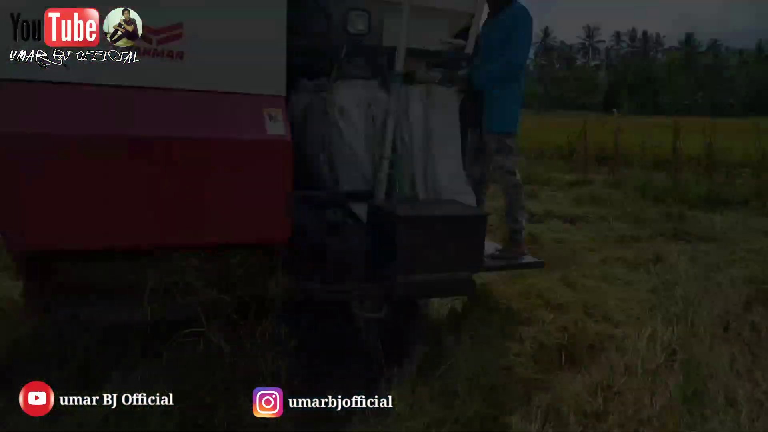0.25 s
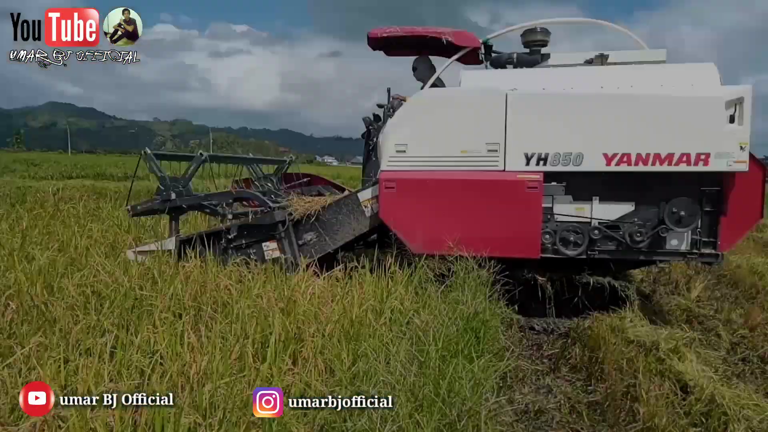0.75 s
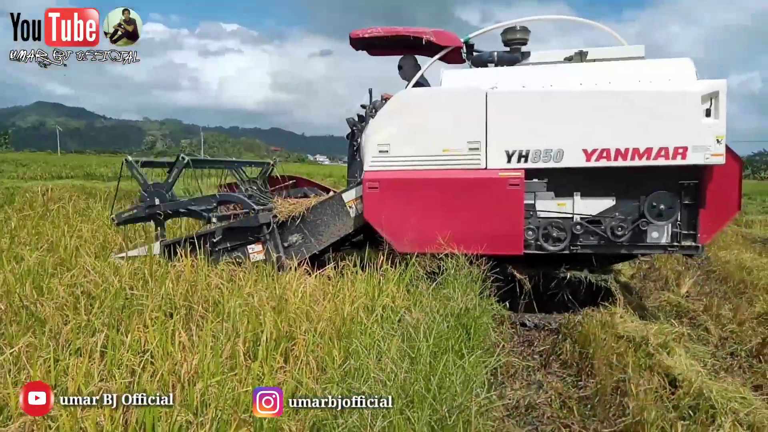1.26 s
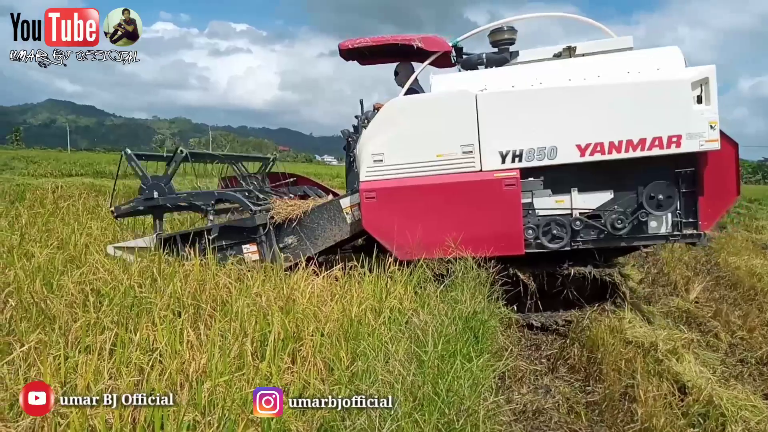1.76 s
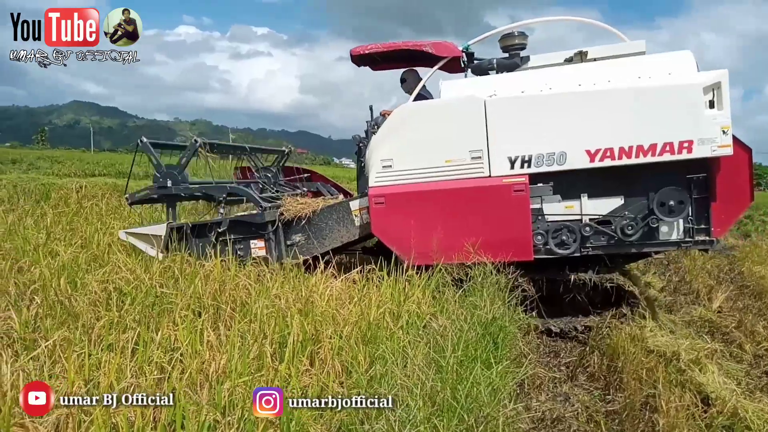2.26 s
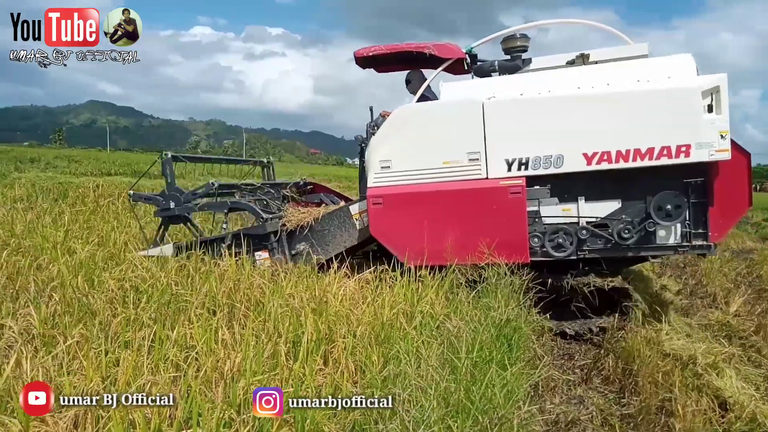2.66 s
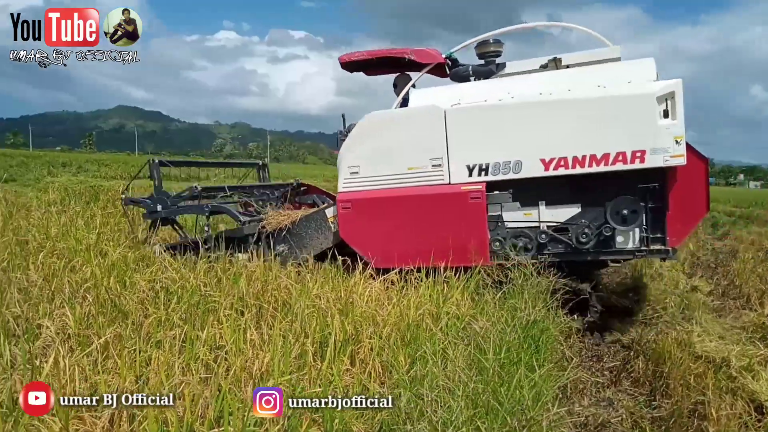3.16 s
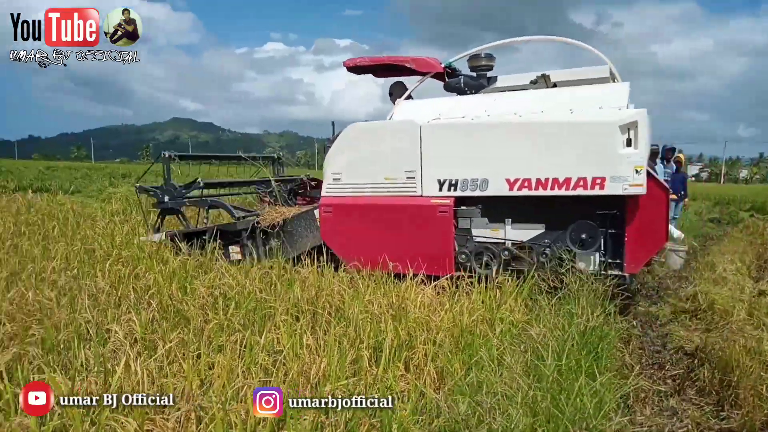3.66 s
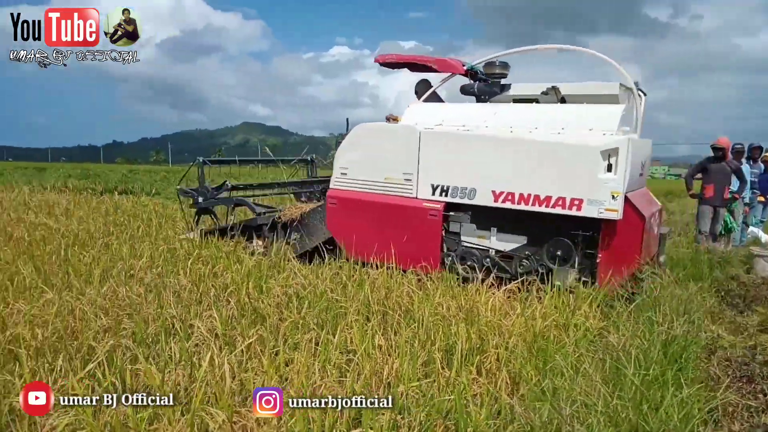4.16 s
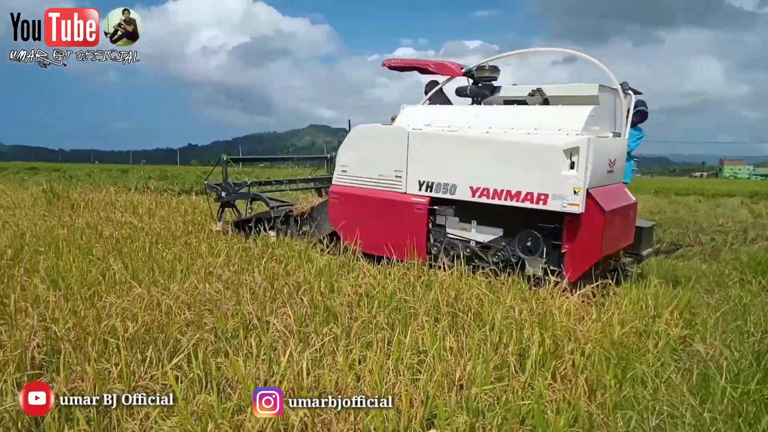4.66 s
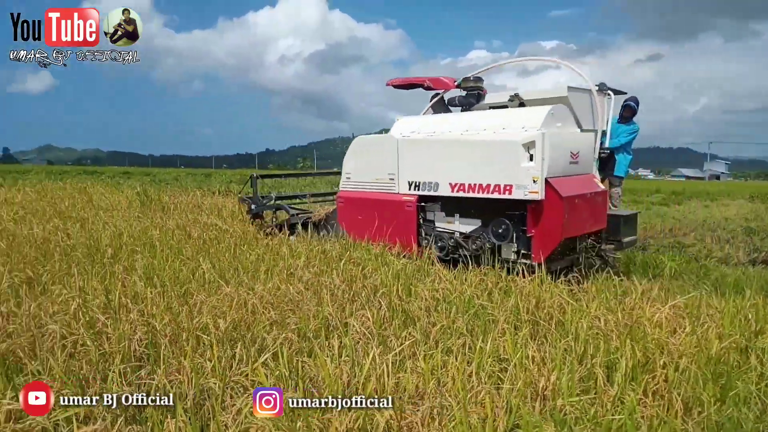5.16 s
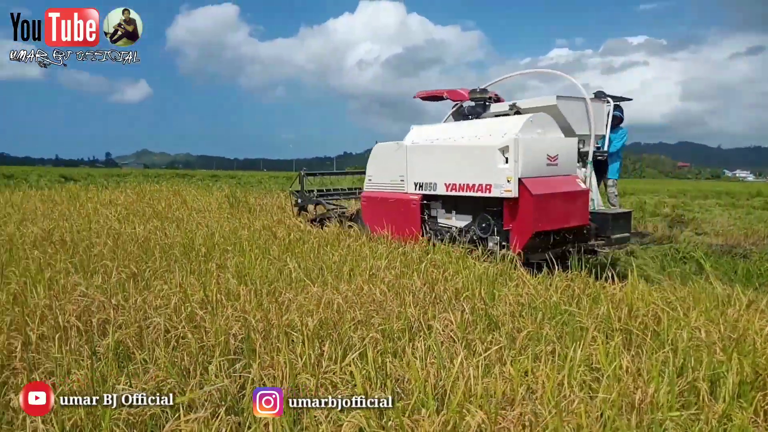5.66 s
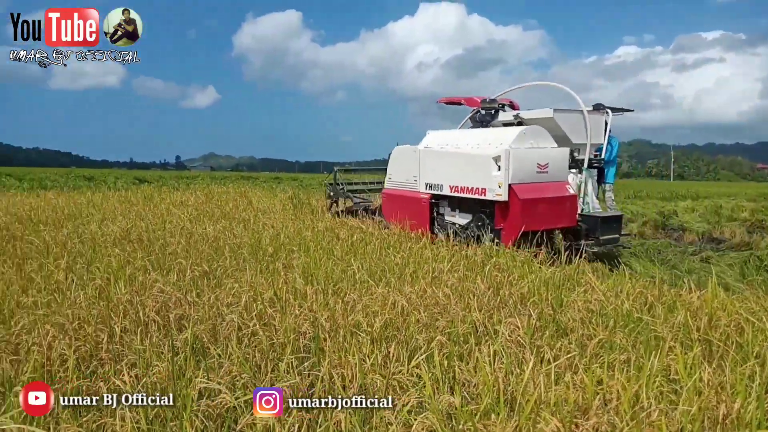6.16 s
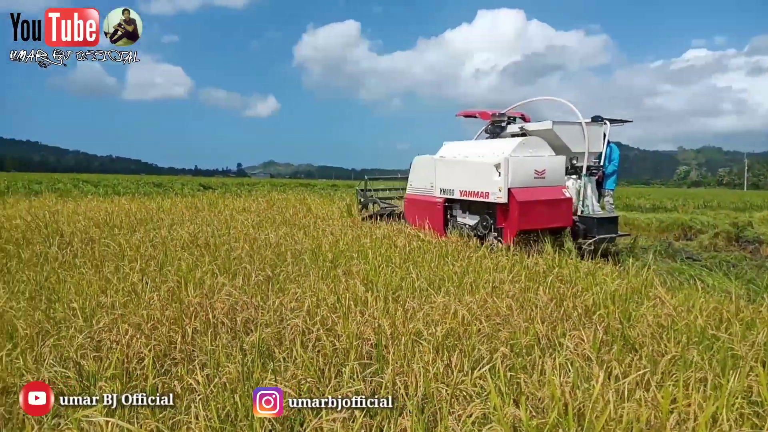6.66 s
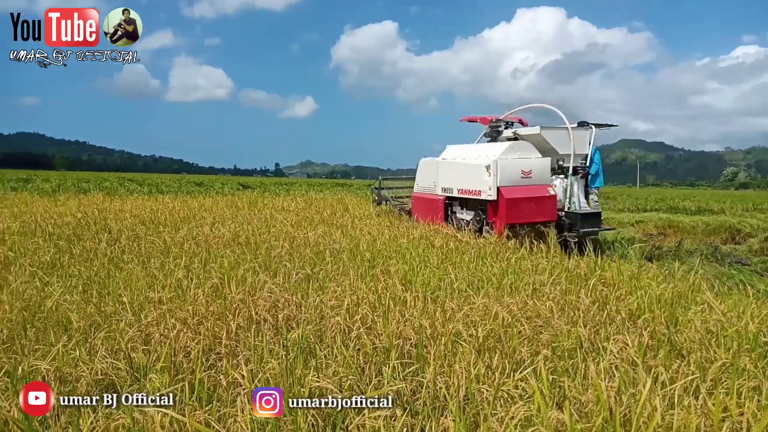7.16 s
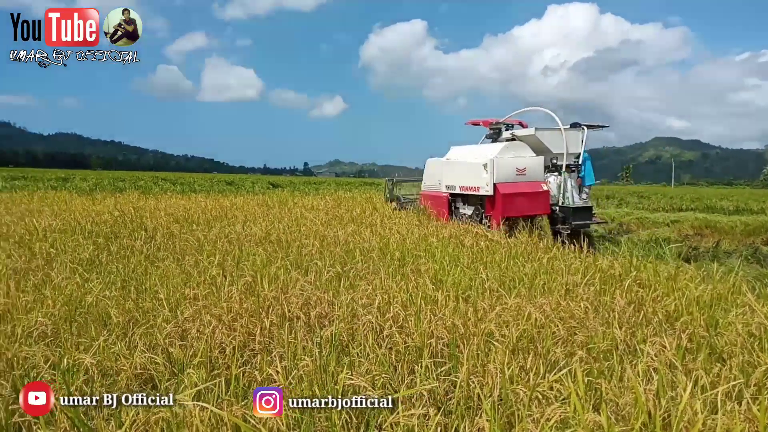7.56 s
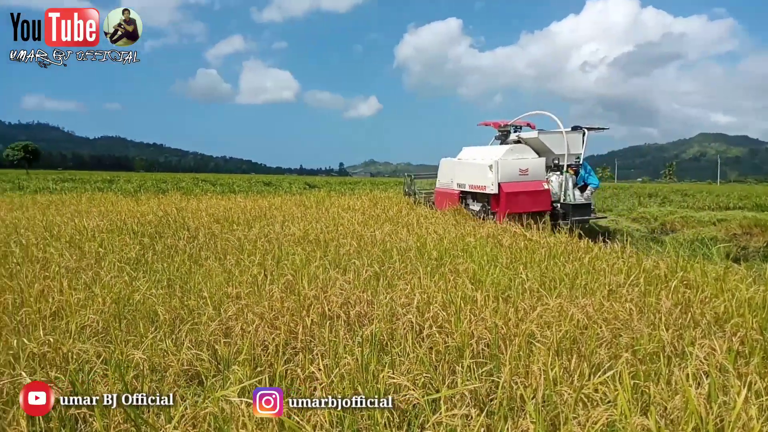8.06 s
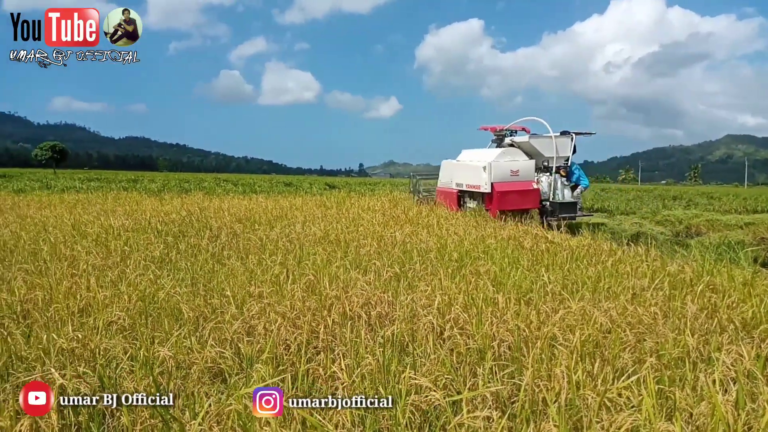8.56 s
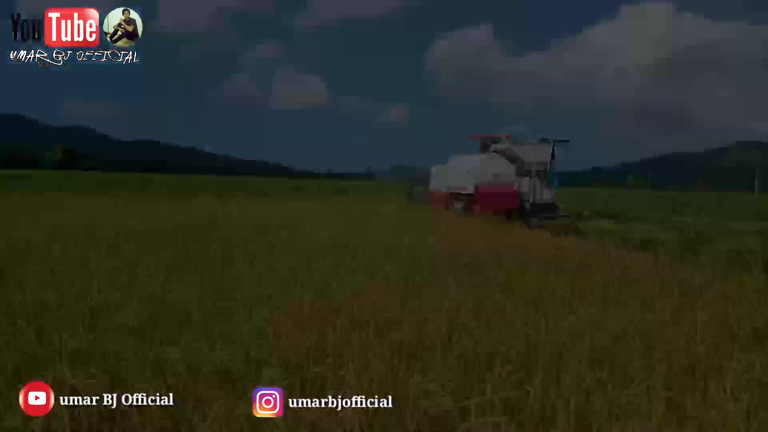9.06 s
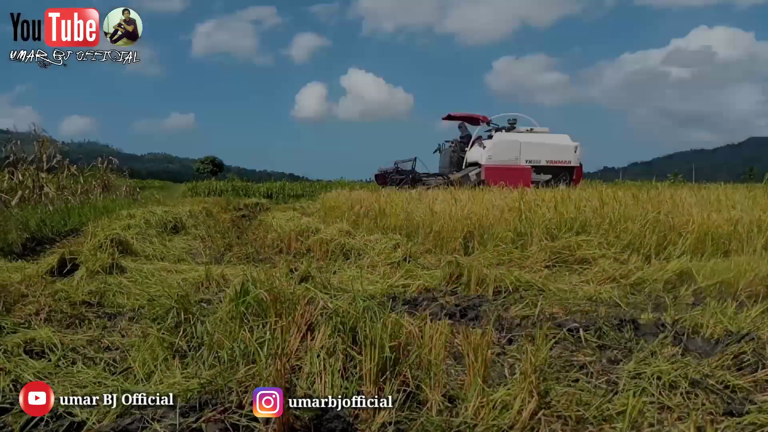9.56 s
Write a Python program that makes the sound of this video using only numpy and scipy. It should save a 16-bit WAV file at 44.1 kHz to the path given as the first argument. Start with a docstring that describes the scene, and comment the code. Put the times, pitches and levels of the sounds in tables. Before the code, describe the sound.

A diesel combine harvester throbs and rattles, tracks clanking as it drives off, with two brief fades to silence.

```python
"""A combine harvester in a rice field

A diesel combine is heard from three places, with fades between them: beside the bagging platform, from
the side as it drives away, and far off. Periodic firings throb in the exhaust, while random impacts of
crop in the threshing drum excite the resonances of sheet-steel panels. Straw crackles, the steel tracks
clank and squeak, and the delay of the ground echo shortens as the machine recedes."""
import sys
import numpy as np
from scipy import signal
from scipy.fft import rfft, irfft
from scipy.io import wavfile
from scipy.ndimage import map_coordinates

SR = 44100
rng = np.random.default_rng(int(sys.argv[2]) if len(sys.argv) > 2 else 0)


def file_out(sig):
    """Save sig as 16-bit WAV at sys.argv[1]."""
    # one column per channel
    cols = np.atleast_2d(sig).T
    # limit, then scale
    lim = np.clip(cols, -1, 1)
    pcm = np.round(lim * 32767).astype(np.int16)
    wavfile.write(sys.argv[1], SR, pcm)


N = 433045
TIME = np.arange(N) / SR

# The four-cylinder engine sags a little under load. Each row: time in seconds, firing rate in Hz.
FIRING_RATE = [(0, 93.25), (1, 95.34), (6.5, 92.58), (8, 94), (9.82, 90.94)]
# Each entry: strength of one cylinder in dB, in firing order.
CYLINDER_DB = [1, -2, 0.78, -1.6]
# Broad spectrum of the machine from each place. Each row: frequency in Hz, level in dB.
REAR_SPECTRUM = [(35, -43), (50, -35), (75, -23), (95, -9), (130, -8), (700, -16.5), (1500, -27),
                 (3300, -25), (5600, -44.5), (7000, -43), (10000, -62), (15000, -62)]
SIDE_SPECTRUM = [(35, -42), (50, -12.5), (75, -8), (95, 0.5), (200, -1.5), (370, -11.5), (700, -15),
                 (850, -22.5), (2400, -36), (3700, -28.5), (5400, -47), (7500, -51.5), (10500, -66.5),
                 (15000, -67)]
FAR_SPECTRUM = [(35, -30), (70, -7), (100, -0.5), (200, 6.5), (700, -19.5), (1500, -33.5), (3600, -29.5),
                (5200, -47.5), (7000, -46), (9000, -66), (15000, -64.4)]
# Resonances of pipe, casing and panels facing each place. Each row: centre in Hz, width in Hz, lift in dB.
REAR_MODES = [(191, 52, 5.5), (310, 27, 7), (481, 15, 3), (612, 30, 8), (700, 110, 7), (875, 28, 3.5),
              (1130, 320, 10.5), (1586, 360, 13.5), (2130, 240, 8.5), (2625, 25, 14), (2800, 97, 8),
              (3430, 78, 8.5), (4430, 161, 3.5), (4851, 224, 4.5), (13454, 3200, 6)]
SIDE_MODES = [(148.7, 17, 4), (191.3, 70, 5), (281.3, 90, 7), (354, 20, -1), (463, 190, 1.5),
              (621, 70, 4.5), (713, 26, 3.5), (986, 323, 7), (1245, 272, 8), (1682, 465, 9.5),
              (2214, 550, 10), (2665, 330, 7), (3192, 580, 7), (6000, 185, 5.5), (6470, 414, 5.5),
              (7100, 90, 4), (7300, 990, 4), (8100, 140, 2.5), (8560, 160, 0.5), (9000, 1400, 3.5),
              (13000, 7000, 8)]
FAR_MODES = [(171, 33, 1.6), (437, 94, 3.6), (938, 111, 7.4), (1336, 280, 17.4), (1791, 300, 15),
             (2212, 172, 7.2), (2500, 110, 7.3), (3350, 758, 7.6)]
# The turning body shades the deepest rumble. Each row: time in seconds, bass gain in dB.
BASS_SHADING = [(1, 0.5), (2.8, 2), (5.7, -2), (8, -2.5), (9.8, 2.5)]
# Wads of crop thump through the drum. Each row: time in seconds, change of the rumble in dB.
WADS = [(1.26, 3), (2.76, -2), (3.35, 2.5), (4.1, 3.5), (4.59, 0.5), (5.75, 1)]
# Tones against the rumble. Each row: time in seconds, then exhaust hum, gear whine and drum drone in dB.
TONE_LEVELS = [(0, -4.5, -29, -18), (.8, -10, -33, -15), (2.8, -12.5, -26, -28), (4.4, -26, -30, -26),
               (5.7, -12.5, -9, -10.5), (6.5, -8.5, -22, -9), (8.7, -7, -19.5, -7), (9.8, -8, -34.5, -15.5)]
# Drone of the shafts and drum. Each row: multiple of the crankshaft speed, relative level in dB.
SHAFT_ORDERS = [(3, 1), (4, -10.5), (6, -0.5), (10, -3), (15, -12.5)]
# The machine drives away and turns its tail. Each row: time in seconds, rumble in dB, thresher in dB.
DRIVE_LEVELS = [(1.3, -15, -17.5), (1.9, -17.5, -18), (2.35, -17.5, -18.3), (3, -18.5, -21),
                (4.5, -19.5, -21), (5.3, -18.6, -20), (5.95, -20.5, -22.5), (6.5, -18.5, -20.5),
                (7.8, -20, -23.5), (8.2, -22.5, -24), (8.9, -25.5, -25)]
# Reflection between the panels. Each row: time in seconds, echo gain in dB.
PANEL_REFLECTION = [(.7, -19.5), (5, -18.5), (7, -29), (8.5, -13.5)]
# Lobes of the hood's ring. Each row: centre in Hz, width in Hz, level against the thresher in dB,
# time of passing in seconds, half length in seconds, climb while passing in Hz per second.
HOOD_LOBES = [(232.5, 59, -3, 4.5, 0.41, 2), (302.4, 36, -4.5, 5.2, 0.49, -3),
              (275.7, 27, -5.5, 8.7, 0.61, -4), (997, 160, -9.5, 7.5, 0.51, 2),
              (1656, 150, -10, 6.33, 0.71, 240.5), (1577, 50, -11, 7.74, 0.21, 0),
              (2142, 130, -14.5, 7.6, .7, 49.5), (2804, 150, -14, 6.1, 1.1, 101),
              (3040, 67, -13.5, 7.65, .38, -4), (3190, 210, -13.5, 6.7, .8, 119),
              (2725, 160, -14.5, 8.8, .6, 2.5)]
# Hard clanks of the tracks and rollers. Each row: start in seconds, level in dB, treble gain in dB.
TRACK_CLANKS = [(.993, -23, -3.5), (1.157, -21, 1), (1.382, -13.5, -5), (1.434, -14, -8), (1.49, -10.5, -5),
                (1.556, -12.5, -14), (1.606, -8.5, 6.5), (1.614, -15, -7), (1.719, -13, -7),
                (2.178, -16, -2), (2.25, -15.5, -1), (2.365, -12.5, -5), (2.581, -13.5, -16),
                (2.63, -18.5, -1), (2.75, -21, -9), (2.876, -13.5, -6.5), (3.57, -20, -5), (3.833, -20, -3),
                (4.08, -20, 2), (4.091, -20.5, -1.5), (5.236, -24, -1), (5.41, -28, 6)]
# Modes of a track link. Each row: frequency in Hz, relative level in dB, time to fall 60 dB in seconds.
LINK_MODES = [(1680, -1, 0.072), (2610, -1, 0.019), (3650, 14, 0.063), (3845, 16, 0.069), (4280, -17, 0.03),
              (4890, 4, 0.067), (6270, 4, 0.028), (6600, 2, 0.023), (7500, -2, 0.042), (8140, -10, 0.039),
              (9200, -12.5, 0.018)]
# Contact noise of a clank. Each row: frequency in Hz, level in dB.
CRACK_SPECTRUM = [(800, 4.5), (2000, 5.5), (3800, 5.5), (5500, -12.5), (8500, -14), (11000, -31),
                  (15000, -26.5)]

SIDE_FROM_S, FAR_FROM_S = .65, 9.45  # changes of listening place
FADE_OUT_S, PAUSE_S, FADE_IN_S = 0.52, .05, 0.39
REAR_RUMBLE_DB, REAR_THRESHER_DB = -21, -20
FAR_RUMBLE_DB, FAR_THRESHER_DB = -25.5, -27.5
STRAW_DB, TICK_DB, SQUEAK_DB = -29.5, -5.5, -50  # against the thresher
TICK_DB_PER_M = -0.4  # standing crop muffles the ticks further with distance
START_M, DRIVE_M_S, SOUND_M_S = 6.5, 1.4, 343
MACHINE_HEIGHT_M, EAR_HEIGHT_M, GROUND_DB = 0.92, 1.543, -24


def undb(db):
    """Amplitude ratio of a level in decibels."""
    return np.exp(np.asarray(db) * (np.log(10) / 20))


def unit(x):
    """Normalisation to an rms of 1."""
    return x / np.sqrt(np.mean(x ** 2) + 1e-18)


def curves(table, t):
    """Linear interpolation in time of each column after the first."""
    times, *columns = np.transpose(table)
    return [np.interp(t, times, column) for column in columns]


def drift(t, rate):
    """Smooth noise: a spline through `rate` random points a second, with a spread near 1."""
    points = rng.standard_normal(4096)
    coarse = t[::32]
    return np.interp(t, coarse, map_coordinates(points, [coarse * rate], order=3, mode="mirror"))


def band(x, hz, kind, order=4):
    """Butterworth filter."""
    return signal.sosfilt(signal.butter(order, hz, kind, fs=SR, output="sos"), x)


def colour(x, spectrum, modes=(), size=16384):
    """Minimum-phase filter: resonance peaks stand on a broad spectrum."""
    f = np.maximum(np.arange(size // 2 + 1) * SR / size, 1)
    hz, db = np.transpose(spectrum)
    peaks_db = sum(lift / (1 + (2 * (f - centre) / width) ** 2) for centre, width, lift in modes)
    gain = undb(np.interp(np.log(f), np.log(hz), db) + peaks_db)
    cepstrum = irfft(np.log(gain))[:size // 2]
    cepstrum[1:] *= 2
    response = irfft(np.exp(rfft(cepstrum, size)))[:size // 2]
    return signal.fftconvolve(x, response)[:len(x)]


def impacts(t, rate, spread_db):
    """Shot noise: independent blows of uneven force, on average `rate` a second."""
    hit = rng.random(len(t)) < rate / SR
    force = undb(spread_db * np.minimum(rng.exponential(size=len(t)), 5))
    return unit(hit * force * rng.standard_normal(len(t)))


def firings(t, wander=.006, scatter_db=2.0, jitter_s=0.00024):
    """Combustion makes a nearly periodic pulse train; returns it and the phase of the cycle (0-1)."""
    cycles = np.cumsum(curves(FIRING_RATE, t)[0] * (1 + wander * drift(t, 5))) / SR
    onsets = np.flatnonzero(np.diff(np.floor(cycles)))
    strength, lateness = rng.standard_normal((2048, 2))[:len(onsets)].T
    force = undb(np.resize(CYLINDER_DB, len(onsets)) + scatter_db * strength)
    onsets = np.clip(onsets + (jitter_s * SR * lateness).astype(int), 0, len(t) - 1)
    pulses = np.bincount(onsets, force, len(t))
    return unit(pulses - pulses.mean()), cycles % 1


def rumble(t, exhaust, casing):
    """Exhaust pulses and crop tumbling in the drum force the low resonances of the casing."""
    tumbling = impacts(t, rate=9000, spread_db=-0.24)
    low = band(colour(tumbling + exhaust, *casing), 448, "low")
    bass = signal.sosfiltfilt(signal.butter(3, 130, fs=SR, output="sos"), low)
    bass_gain = undb(curves(BASS_SHADING, t)[0])
    return unit(low + (bass_gain - 1) * bass)


def crop_feed(t, surge_db=1, wad_half_s=0.023):
    """Amplitude modulation: crop enters the drum unevenly, now and then in a thick wad."""
    wads_db = sum(db * np.exp(-((t - s) / wad_half_s) ** 2) for s, db in WADS)
    return undb(surge_db * drift(t, 20) + wads_db)


def tone(t, hz, wander, flutter_db):
    """A sinusoid whose frequency and amplitude waver at random, as under a changing load."""
    cycles = np.cumsum(hz * (1 + wander * drift(t, 9))) / SR
    return unit(np.sin(2 * np.pi * cycles) * undb(flutter_db * drift(t, 11)))


def machine_tones(t):
    """Periodic motion gives spectral lines: shaft drone, exhaust hum and gear whine."""
    hum_db, whine_db, drone_db = curves(TONE_LEVELS, t)
    crank_hz = curves(FIRING_RATE, t)[0] / 2  # two firings a turn
    drone = sum(undb(db) * tone(t, order * crank_hz, wander=.008, flutter_db=2.5)
                for order, db in SHAFT_ORDERS)
    hum = tone(t, hz=98.9, wander=0.01534, flutter_db=-4.0)
    whine = tone(t, hz=628, wander=.009, flutter_db=1.5)
    return undb(hum_db) * hum + undb(whine_db) * whine + undb(drone_db) * unit(drone)


def thresher(t, exhaust, firing_phase, surge, knock_db, casing):
    """Impact excitation: grain and stalks pelt the panels, and diesel knock adds a burst per firing."""
    knock = unit(np.exp(-firing_phase / 0.45) * rng.standard_normal(len(t)))
    pelting = impacts(t, rate=10000, spread_db=1.0) * undb(.5 * drift(t, 45))
    pelting *= surge ** 0.42  # follows the feed only in part
    clatter = colour(pelting + undb(knock_db) * knock + undb(-3) * exhaust, *casing)
    return unit(band(band(clatter, 391, "high"), 4800, "low", order=8))


def straw(t, casing):
    """Sparse impulses of dry straw crackle over the broadband hiss of the cleaning fan."""
    crackle = impacts(t, rate=700, spread_db=0.5) * undb(-6.5 + 3 * drift(t, 30))
    hiss = rng.standard_normal(len(t))
    return unit(band(colour(crackle + hiss, *casing), 4710, "high", order=8))


def harvester(gain, rumble_db, thresher_db, casing, exhaust_db, knock_db):
    """Source and filter: engine, drum and straw sound through one casing (its spectrum and modes)."""
    audible = gain > 0
    t = TIME[audible]
    pulses, firing_phase = firings(t)
    exhaust = undb(exhaust_db) * pulses
    low = rumble(t, exhaust, casing)
    surge = crop_feed(t)
    low = (low + machine_tones(t)) * surge
    high = thresher(t, exhaust, firing_phase, surge, knock_db, casing)
    high += undb(STRAW_DB) * straw(t, casing)
    out = np.zeros(N)
    out[audible] = (gain * undb(rumble_db))[audible] * low + (gain * undb(thresher_db))[audible] * high
    return out


def fade(start_s, end_s):
    """Square-law gain that opens after one change of place and closes before the next."""
    opening = np.clip((TIME - start_s - PAUSE_S / 2) / FADE_IN_S, 0, 1)
    closing = np.clip((end_s - PAUSE_S / 2 - TIME) / FADE_OUT_S, 0, 1)
    return (opening * closing) ** 2


def receding_gain():
    """Amplitude envelope of the thresher as it drives away, zero at other times."""
    return fade(SIDE_FROM_S, FAR_FROM_S) * undb(curves(DRIVE_LEVELS, TIME)[1])


def distance(t):
    """Metres from the listener to the machine, which recedes at uniform speed."""
    return START_M + DRIVE_M_S * np.maximum(t - SIDE_FROM_S, 0)


def panel_echo(x, lag_ms):
    """Comb filtering: a short, constant bounce between steel walls ripples the spectrum."""
    echo = np.interp(TIME - lag_ms / 1000, TIME, band(x, 500, "high", order=1))
    return x + undb(curves(PANEL_REFLECTION, TIME)[0]) * echo


def ground_echo(x):
    """Two-path interference: the bounce off the field lags less with distance, so its comb climbs."""
    lag_s = 2 * MACHINE_HEIGHT_M * EAR_HEIGHT_M / distance(TIME) / SOUND_M_S
    echo = np.interp(TIME - lag_s, TIME, band(x, 5000, "low", order=1))
    return x + undb(GROUND_DB) * echo


def gliding_band(x, hz, width):
    """Heterodyne band-pass whose centre moves from sample to sample."""
    carrier = np.exp(2j * np.pi * np.cumsum(hz) / SR)
    return np.real(carrier * band(x * carrier.conj(), width / 2, "low", order=2))


def hood_ring():
    """Directivity: straw rings the tail hood, and each mode swells as its lobe sweeps the listener."""
    blows = impacts(TIME, rate=4000, spread_db=1.5)
    ring = 0
    for hz, width, db, passing_s, half_s, climb in HOOD_LOBES:
        off_axis = (TIME - passing_s) / half_s
        if climb:
            mode = gliding_band(blows, hz + climb * 2 * half_s * np.tanh(off_axis / 2), width)
        else:
            mode = band(blows, [hz - width / 2, hz + width / 2], "bandpass", order=2)
        ring += unit(mode) * undb(db) / (1 + off_axis ** 2)
    return ring * receding_gain()


def clank(treble_db, crack_db=5.0, contact_s=0.0034, crack_t60_s=0.077):
    """Free vibration: a brief scraping contact cracks and excites the damped modes of a steel link."""
    t = TIME[:SR // 8]
    hz, db, t60 = np.transpose(LINK_MODES)
    detune = 1 + 0.0089 * rng.standard_normal(len(hz))
    decays = np.exp(-np.log(1000) * np.outer(1 / t60, t))
    response = undb(db) @ (np.sin(2 * np.pi * np.outer(hz * detune, t)) * decays)
    contact = rng.standard_normal(len(t)) * np.exp(-t / contact_s)
    ring = signal.fftconvolve(contact, response)[:len(t)]
    burst = rng.standard_normal(len(t)) * np.exp(-np.log(1000) * t / crack_t60_s)
    crack = colour(burst, CRACK_SPECTRUM, size=512)
    sound = unit(unit(ring) + undb(crack_db) * unit(crack))
    tilt = [(3800, 0), (8500, treble_db), (12000, treble_db / 2 - 4.5)]
    return undb(-19.0) * colour(sound, tilt, size=512)  # peak near 1


def tracks(links_per_s, scatter_db, tick_treble_db):
    """Steel impacts: hard clanks stand over the light, uneven tick of links passing the sprocket."""
    blows = [(s, undb(db), treble_db) for s, db, treble_db in TRACK_CLANKS]
    envelope = receding_gain()
    for link, (lateness, force) in enumerate(rng.standard_normal((80, 2))):
        s = SIDE_FROM_S + (link + .25 * lateness) / links_per_s
        if SIDE_FROM_S < s < FAR_FROM_S:
            tick_db = TICK_DB + TICK_DB_PER_M * distance(s) + scatter_db * force
            blows.append((s, envelope[int(s * SR)] * undb(tick_db), tick_treble_db))
    out = np.zeros(N)
    for s, gain, treble_db in blows:
        sound = gain * clank(treble_db)
        start = int(s * SR)
        out[start:start + len(sound)] += sound
    return out


def roller_squeaks(spread_db):
    """Friction: the dry rollers chirp faintly on three high notes that come and go."""
    notes = 0
    for hz in (7230, 8130, 8560):
        note = tone(TIME, hz, wander=.012, flutter_db=-3.0)
        notes += note * undb(spread_db * np.minimum(drift(TIME, 22), 2.2))
    roughness = 1 + .8 * drift(TIME, 350)
    return unit(notes * roughness) * receding_gain() * undb(SQUEAK_DB)


def scene():
    """Superposition of the sources at three listening places, one after another."""
    rear = harvester(fade(-np.inf, SIDE_FROM_S), REAR_RUMBLE_DB, REAR_THRESHER_DB,
                     (REAR_SPECTRUM, REAR_MODES), exhaust_db=-12, knock_db=-4.0)
    side = harvester(fade(SIDE_FROM_S, FAR_FROM_S), *curves(DRIVE_LEVELS, TIME),
                     (SIDE_SPECTRUM, SIDE_MODES), exhaust_db=-17, knock_db=-18.5)
    far = harvester(fade(FAR_FROM_S, np.inf), FAR_RUMBLE_DB, FAR_THRESHER_DB,
                    (FAR_SPECTRUM, FAR_MODES), exhaust_db=-14.5, knock_db=-14)
    side = ground_echo(panel_echo(side, lag_ms=1.847))
    running_gear = tracks(links_per_s=9.0, scatter_db=4, tick_treble_db=-0.5)
    running_gear += roller_squeaks(spread_db=9)
    return (rear + side + hood_ring() + running_gear + far)[None]


def record(dry):
    """Band limiting: a steep elliptic low-pass removes the treble above 15.5 kHz."""
    return signal.sosfilt(signal.ellip(10, .2, 70, 15500, fs=SR, output="sos"), dry)


dry = scene()
out = record(dry)
file_out(out)
```